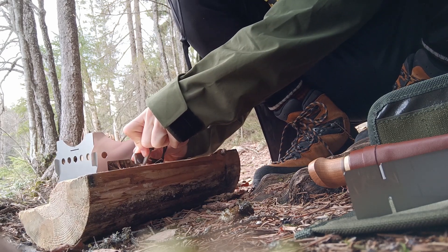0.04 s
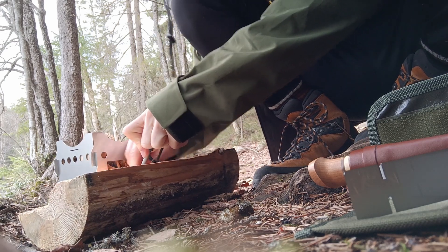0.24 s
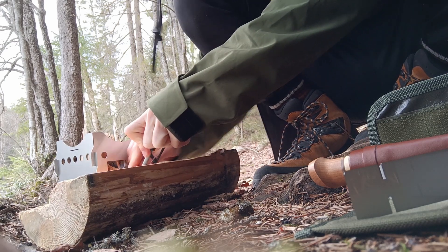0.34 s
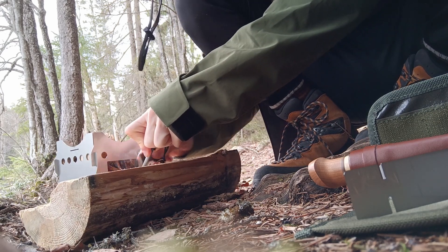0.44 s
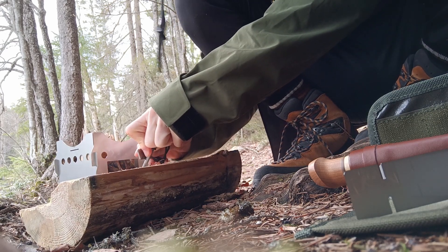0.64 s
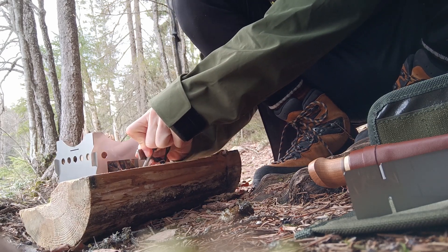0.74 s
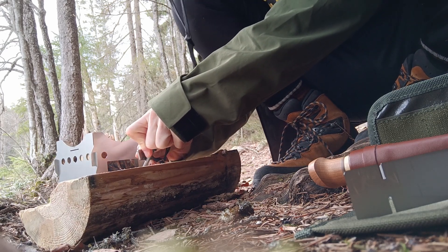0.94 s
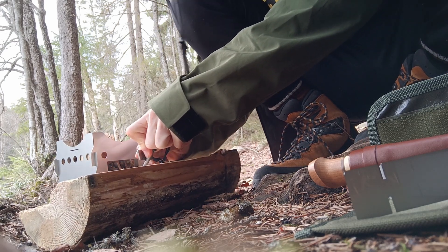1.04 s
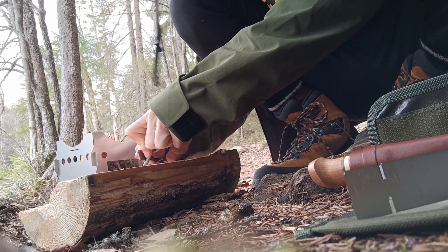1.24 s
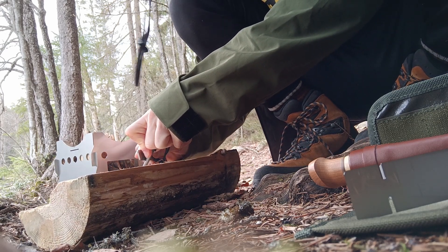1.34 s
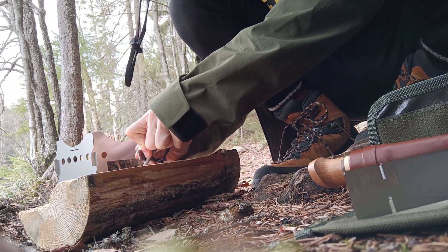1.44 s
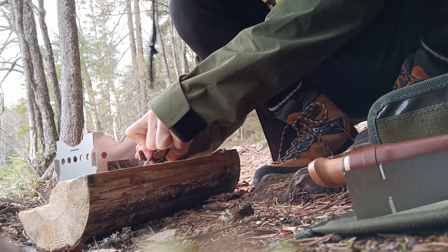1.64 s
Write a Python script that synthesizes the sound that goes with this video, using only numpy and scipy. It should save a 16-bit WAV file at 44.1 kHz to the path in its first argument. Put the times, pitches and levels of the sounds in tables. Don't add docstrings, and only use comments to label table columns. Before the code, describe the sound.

A metal striker scrapes sharply along a fire-starting rod at about 0.2 to 0.3 s, a ringing, gritty rasp that stutters into a dull log thump and crushed dry tinder until 0.4 s. Light ticks and a faint drag back follow to 0.7 s, with a dry snap at 0.72. Then near quiet, small ticks around 1.03 and 1.4, tiny crackles near 1.68; close, dry, faint forest wind and very faint birds.

```python
import sys
import numpy as np
from scipy import signal
from scipy.fft import rfft, irfft
from scipy.io import wavfile
from scipy.ndimage import uniform_filter1d

SR = 44100
rng = np.random.default_rng(int(sys.argv[2]) if len(sys.argv) > 2 else 0)


def gain_from_db(level_db):
    decades = np.asarray(level_db, float) / 20
    return 10 ** decades


def digitize_waveform(pressure):
    field = np.atleast_2d(pressure).T
    bounded = np.clip(field, -1, 1)
    quanta = np.round(bounded * 32767).astype(np.int16)
    wavfile.write(sys.argv[1], SR, quanta)


N = 74970

# (frequency [Hz], level [dB], decay time T60 [s])
LOG_MODES = [(58, 4, 0.17), (110, -10.5, .1), (142, -0.5, 0.13), (195.3, -2, 0.07), (287, -6.5, .06)]
# (frequency [Hz], bandwidth [Hz], level [dB])
BARK_MODES = [(567, 92, 4.5), (840, 160, 0.5), (347, 210, -4.5), (186.3, 110, -1.5), (1050, 250, -5.5)]
BARK_PATCHY_DB = 1.2


def level(x, db):
    return x * gain_from_db(db) / np.sqrt(np.mean(x ** 2))


def colour(x, points):
    hz, db = np.array(points, float).T
    log_hz = np.log(np.arange(N // 2 + 1) * SR / N + 1)
    below = np.clip(np.log(hz[0]) - log_hz, 0, 3)
    above = np.clip(log_hz - np.log(hz[-1]), 0, 3)
    gain_db = np.interp(log_hz, np.log(hz), db) - 40 * (below + above)
    return irfft(rfft(x) * gain_from_db(gain_db), N)


def ring(x, modes):
    out = 0
    for k, (hz, width, db) in enumerate(modes):
        b, a = signal.iirpeak(hz, hz / max(width, 5), fs=SR)
        out = out + (-1) ** k * gain_from_db(db) * signal.lfilter(b, a, x)
    return out


def grains(rough_db):
    size_db = rough_db * np.minimum(rng.exponential(size=N), 3.5)
    return level(rng.standard_normal(N) * gain_from_db(size_db), 0)


def walk(rate):
    k = int(SR / rate)
    steps = np.repeat(rng.standard_normal(N // k + 1), k)
    return 1.3 * uniform_filter1d(uniform_filter1d(steps, k), k)[:N]


def pressure(curve):
    t = np.arange(N) / SR
    return gain_from_db(np.interp(t, *np.array(curve).T, left=-200, right=-200))


def bursts(table, column):
    rise_share = 0.27
    t, env = np.arange(N) / SR, np.zeros(N)
    for row in table:
        u = (t - row[0]) / row[2]
        rise = np.clip(u / rise_share, 0, 1) ** 2
        fall = np.exp(-np.clip(u - .7, 0, 99) / .55)
        env += gain_from_db(row[column]) * rise * fall
    return env


def shaken(noise, env, modes, patchy_db, held=0.):
    out = 0
    drive = noise * env ** (1 - held)
    for k, mode in enumerate(modes):
        out = out + (-1) ** k * ring(drive * gain_from_db(patchy_db * walk(60)), [mode])
    return out * env ** held / np.std(ring(noise, modes))


def rod_ring(chatter, bite):
    # (time [s], level [dB], length [s])
    stutter = [(.2965, -22.5, 0.0026), (.302, -29.5, 0.0068), (.317, -30, 0.0045), (.325, -31, 0.0058),
               (.331, -32, 0.0063), (.339, -34.5, 0.0058), (.346, -53.5, 0.0054), (.354, -33.5, 0.0048),
               (.363, -43.5, 0.0071), (.37, -50, 0.016), (.385, -41, 0.0034)]
    # (time [s], level [dB])
    rebound = [(.431, -51), (.437, -47), (.453, -36.5), (.462, -69), (.49, -77)]
    # (time [s], level [dB])
    drag = [(.546, -62), (.551, -45.5), (.562, -54), (.592, -60.5), (.604, -59.5), (.616, -59.5),
            (.637, -52.5), (.657, -69)]
    # (time [s], level [dB])
    slip = [(.669, -63), (0.671, -47), (.69, -62), (.705, -58.5), (.74, -69), (.77, -97)]
    # (frequency [Hz], bandwidth [Hz], level [dB])
    held_modes = [(1110.4, 26, 5), (1338, 68, -7.5), (1558, 200, -12.5), (1760, 78, -3), (1851, 66, -2.5),
                  (2085, 74, -9), (2236, 40, -2.5), (2640, 76, -26), (2970, 38, -19)]
    # (frequency [Hz], bandwidth [Hz], level [dB])
    loose_modes = [(1060, 21, -14.5), (1777, 55, -2.5), (2120, 110, -6), (2257, 40, 0), (2600, 63, -9),
                   (2924, 69, -8.5), (3800, 170, -16.5), (4540, 96, -8.5), (5690, 45, -14),
                   (6650, 100, -26), (6770, 160, -17.5), (8300, 81, -13)]
    held_share = .4
    hz, width, db = held_modes[0]
    skid_modes = [(hz, width, db - 4.5)] + held_modes[1:]
    middle_modes = held_modes[2:6]
    low_modes = loose_modes[1:7] + loose_modes[9:11]
    out = shaken(chatter, bite, held_modes, 1.2, held_share)
    out += shaken(chatter, bursts(stutter, column=1), skid_modes, 1.1, held_share)
    out += shaken(chatter, pressure(rebound), middle_modes, 0.5, held_share)
    out += shaken(chatter, pressure(drag), loose_modes, 4.5, 0.24)
    return out + shaken(chatter, pressure(slip), low_modes, 1.4)


def shavings(bite):
    # (frequency [Hz], density [dB per Hz])
    grit_colour = [(1500, -17), (3000, -11.5), (4400, 4.5), (5600, -0.5), (7000, 5), (9200, -6.5),
                   (11800, 3.5), (15500, -8.5)]
    grit_db, rough_db, power = -12, 5.5, 1.5
    hiss = level(colour(grains(rough_db), grit_colour), grit_db)
    return hiss * bite * (bite / bite.max()) ** (power - 1)


def support_hum(chatter, bite):
    into_log_db, into_bark_db = -16, -13
    broad_log = [(hz, hz / 5, db) for hz, db, _ in LOG_MODES]
    log = gain_from_db(into_log_db) * shaken(grains(1.5), bite, broad_log, 1.6)
    return log + gain_from_db(into_bark_db) * shaken(chatter, bite, BARK_MODES, BARK_PATCHY_DB)


def scrape():
    # (time [s], level [dB])
    stroke = [(.213, -64), (.221, -46.5), (.227, -41.5), (.24, -37.5), (.245, -27), (.256, -28.5),
              (.265, -26), (.28, -24.5), (.293, -37.5)]
    bite = pressure(stroke)
    chatter = grains(1.5) * gain_from_db(1.2 * walk(300))
    return rod_ring(chatter, bite) + shavings(bite) + support_hum(chatter, bite)


def ticks():
    # (time [s], peak level [dB], strongest ring [Hz], splash level [dB])
    touches = [(.298, -57, 4750, -8), (0.337, -33.5, 5480, -4), (.44, -46, 6950, 4.5),
               (0.4464, -36.5, 2970, -7), (.452, -40, 2970, 2.5), (0.47, -44.5, 4000, -1),
               (0.5498, -38.5, 4900, -0.5), (.592, -53, 5000, -2.5), (.637, -53, 5830, -27),
               (0.643, -55, 4000, -5), (.672, -37, 6850, -11), (.691, -55, 6840, -10),
               (.744, -60.5, 5900, -1), (0.962, -79, 4500, 3), (1.0272, -51, 11540, -28),
               (1.048, -73, 5500, -5.5), (1.09, -65.5, 3740, -14), (1.092, -64, 6900, -14),
               (1.134, -71.5, 2170, -4), (1.364, -65, 6900, -14), (1.376, -56, 6850, -14),
               (1.397, -47.5, 3880, -14), (1.4075, -37, 6830, -20.5)]
    # (frequency [Hz], density [dB per Hz])
    splash_colour = [(1600, -12), (2600, 4), (5000, 0), (8200, -1.5), (9200, -23.5)]
    ring_q, all_splash_db, splash_s, onset_s = 34, 1.4, 0.002, 0.00032
    t, out = np.arange(SR // 20) / SR, np.zeros(N + SR)
    noise = level(colour(rng.standard_normal(N), splash_colour), all_splash_db)
    for s, db, hz, splash_db in touches:
        i = int(s * SR)
        tone = np.sin(2 * np.pi * hz * t) * np.exp(-np.pi * hz / ring_q * t) * (1 - np.exp(-t / onset_s))
        splash = gain_from_db(splash_db) * noise[i:i + len(t)] * np.exp(-t / splash_s)
        out[i:i + len(t)] += gain_from_db(db) * (tone + splash)
    return out[:N]


def log_thump():
    # (time [s], peak level [dB], contact time [s], share reaching the deepest mode [dB])
    blows = [(0.269, -37, 0.0043, -13), (0.285, -27, 0.0031, -9), (0.298, -26, 0.0024, 2),
             (0.307, -20.5, 0.006, 1), (.318, -26.5, 0.0042, -1), (0.331, -35.5, 0.0066, -6),
             (0.346, -35, 0.0024, -9.5), (0.354, -32.5, 0.002, -11.5), (0.378, -31.5, 0.002, -10),
             (0.386, -30.5, 0.0038, -12), (.426, -44.5, 0.0033, -14), (0.666, -49.5, 0.0027, -9)]
    t = np.arange(N) / SR
    deep_push, push = np.zeros(N), np.zeros(N)
    for s, db, contact, deep_db in blows:
        pulse = np.sin(np.pi * np.clip((t - s) / contact, 0, 1)) ** 2
        pulse *= gain_from_db(db) * 2 / (contact * SR)
        deep_push += gain_from_db(deep_db) * pulse
        push += pulse
    t = t[:SR // 2]
    body = [gain_from_db(db) * np.sin(2 * np.pi * hz * t) * 1000. ** (-t / t60) for hz, db, t60 in LOG_MODES]
    return (signal.fftconvolve(deep_push, body[0]) + signal.fftconvolve(push, sum(body[1:])))[:N]


def tinder():
    # (time [s], hiss level [dB], length [s], knock level [dB])
    crushes = [(.297, -45.5, 0.013, -32), (.318, -42, 0.014, -34.5), (.333, -33, 0.0037, -32.5),
               (.343, -49, 0.014, -41), (.3, -55.5, 0.15, -52), (.369, -42.5, 0.0099, -37),
               (.379, -52.5, 0.0092, -39.5), (.386, -41, 0.0034, -51.5), (.4, -55, 0.0017, -72),
               (.411, -62, 0.0017, -68), (.418, -42, 0.0059, -62), (.4225, -47, 0.0062, -41.5),
               (.433, -48, 0.0049, -45), (.439, -42, 0.0029, -39), (.445, -63, 0.005, -44.5),
               (.451, -50, 0.0061, -42.5), (.46, -57, 0.01, -52), (.466, -47, 0.0049, -49),
               (.4705, -55, 0.0073, -43), (.479, -55, 0.004, -46), (.485, -56, 0.0064, -50),
               (.496, -58.5, 0.0061, -53), (.526, -59, 0.0057, -60), (.548, -82, 0.0064, -48),
               (.54, -78, 0.033, -69), (.732, -84, 0.015, -56.5)]
    # (time [s], hiss level [dB], length [s], knock level [dB])
    snaps = [(.661, -55, 0.0057, -66), (.687, -64, 0.0066, -77), (0.707, -61, 0.0034, -65),
             (0.7138, -54, 0.0019, -46.5), (0.7172, -38.5, 0.003, -41.5), (0.7192, -32, 0.0018, -30.5),
             (.722, -45.5, .003, -65), (1.0269, -70.5, 0.0057, -66), (1.364, -69.5, .005, -77),
             (1.377, -65, 0.0045, -67), (1.3963, -50.5, 0.0035, -56), (1.401, -49, 0.0051, -57.5),
             (1.405, -50.5, 0.0034, -48), (1.6685, -56, 0.002, -75), (1.671, -60, 0.0062, -76),
             (1.6801, -56.5, 0.003, -64), (1.684, -55.5, 0.0038, -59.5), (1.688, -62, .002, -60),
             (1.691, -64, .002, -78)]
    # (frequency [Hz], bandwidth [Hz], level [dB])
    flakes = [(2943, 270, -8.5), (4000, 290, -5), (4550, 230, -6.5), (5180, 220, -8), (6630, 330, -4.5),
              (8200, 400, -9), (10030, 420, -6), (11300, 720, -3), (12700, 1100, -2.5), (14300, 740, -7),
              (15600, 1000, -12)]
    crush_tilt_db = -2.5
    flake_patchy_db, snap_db, snap_bark_db, thud_db = 1.5, 6, -16.5, -11
    snap_hz, snap_width_hz, thud_hz, thud_width_hz = 690, 560, 175, 115
    dull = [(hz, 1.05 * width, db + crush_tilt_db * np.log2(hz / 4000)) for hz, width, db in flakes]
    crackle = grains(3)
    hiss = shaken(crackle, bursts(crushes, column=1), dull, flake_patchy_db)
    hiss += shaken(crackle, bursts(snaps, column=1), flakes, flake_patchy_db)
    knock = shaken(grains(1.2), bursts(crushes, column=3), BARK_MODES, BARK_PATCHY_DB, 0.27)
    blow = np.zeros(N)
    for s, _, _, db in snaps:
        blow[int(s * SR)] -= gain_from_db(db + snap_db) * SR / np.pi
    blow = signal.sosfilt(signal.butter(2, 1150, fs=SR, output="sos"), blow)
    knock += gain_from_db(snap_bark_db) * ring(blow, BARK_MODES) / snap_width_hz
    snap_mode = [(snap_hz, snap_width_hz, 0)]
    snap = 2 * ring(ring(blow, snap_mode), snap_mode) / snap_width_hz
    thud = ring(ring(blow, [(thud_hz, thud_width_hz, 0)]), [(thud_hz, thud_hz, 0)])
    return hiss + knock + snap + gain_from_db(thud_db) * thud / thud_width_hz


def scatter(near):
    trees_db, t60_s, dull_hz = -28, .12, 4000
    t = np.arange(SR // 2) / SR
    tail = signal.lfilter(*signal.butter(1, dull_hz, fs=SR), rng.standard_normal(len(t)))
    tail *= 1000. ** (-t / t60_s) * (t > .003)
    tail *= gain_from_db(trees_db) / np.sqrt(np.sum(tail ** 2))
    return signal.fftconvolve(near, tail)[:N]


def birds():
    # (middle [s], length [s], frequency [Hz], bandwidth [Hz], level [dB])
    chirps = [
        (.0, 0.1, 7210, 1120, -77.5),
        (.0, 0.046, 7300, 120, -79),
        (0.895, 0.035, 3680, 149, -84),
    ]
    t, out = np.arange(N) / SR, np.zeros(N)
    for s, length, pitch_hz, width_hz, db in chirps:
        band = [(pitch_hz, width_hz, 0)]
        chirp = level(ring(ring(rng.standard_normal(N), band), band), db)
        out += np.exp(-((t - s) / length) ** 2) * chirp
    return out


def forest_air():
    # (frequency [Hz], density [dB per Hz])
    wind_colour = [(24, -48), (40, -21.5), (154, -1), (258, -17.5), (305, -6.5), (355, -12), (377, -18),
                   (527, -13.5), (1500, -33.5), (1950, -67), (3300, -120)]
    # (frequency [Hz], density [dB per Hz])
    hiss_colour = [(880, -28.5), (1500, -21.5), (1620, -1.5), (2460, -4.5), (5280, -13), (7840, -14),
                   (8400, -20), (11900, -7.5), (16000, -8.5)]
    wind_db, hiss_db, gust_db = -62, -80, 1.0
    steady = colour(rng.standard_normal(N), wind_colour)
    wind = np.zeros(N)
    for k, hz in enumerate(45 * 2 ** np.arange(0, 5.6, .5)):
        wind += ring(steady, [(hz, hz / 3, 0)]) * (-1) ** k * gain_from_db(gust_db * walk(16))
    hiss = level(colour(grains(3.1), hiss_colour), hiss_db) * gain_from_db(0.49 * walk(5.3))
    return level(wind, wind_db) + hiss


def scene():
    near = scrape() + ticks() + log_thump() + tinder()
    return (near + scatter(near) + birds() + forest_air())[None]


def roll_off(x):
    return signal.sosfilt(signal.butter(12, 16650, fs=SR, output="sos"), x)


def record(dry):
    low_hz, top_hz = 44, 16000
    mix = signal.sosfiltfilt(signal.butter(3, low_hz, "high", fs=SR, output="sos"), dry)
    mix = signal.sosfilt(signal.ellip(8, .2, 50, top_hz, fs=SR, output="sos"), mix)
    return roll_off(mix)


dry = scene()
out = record(dry)
digitize_waveform(out)
```